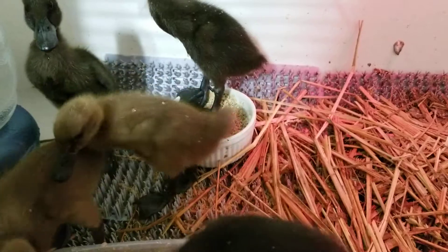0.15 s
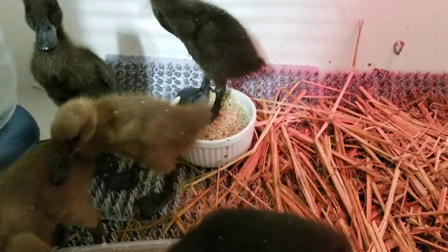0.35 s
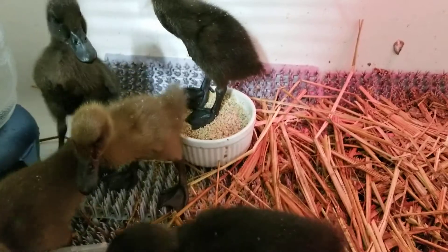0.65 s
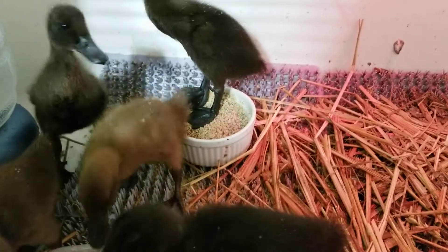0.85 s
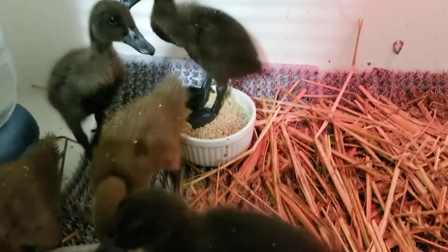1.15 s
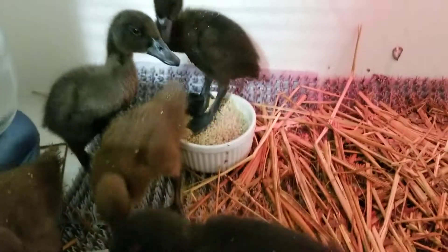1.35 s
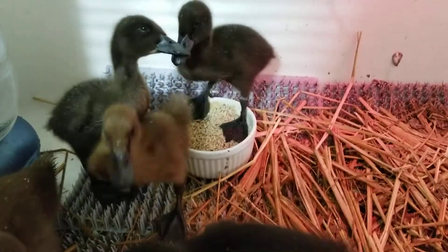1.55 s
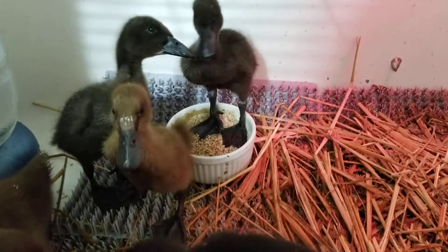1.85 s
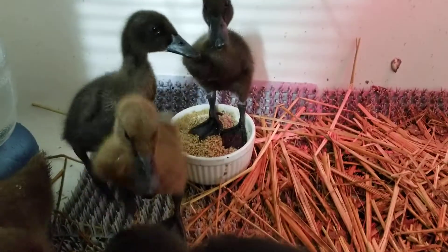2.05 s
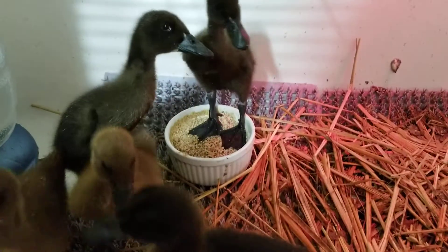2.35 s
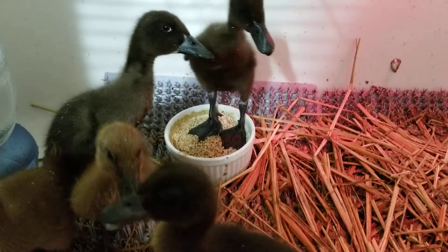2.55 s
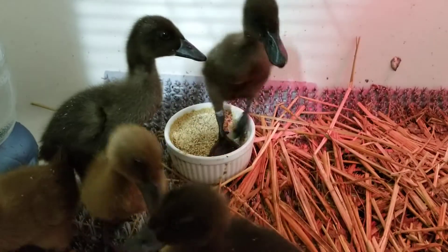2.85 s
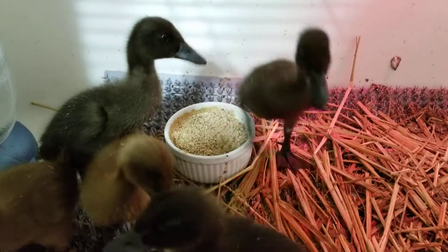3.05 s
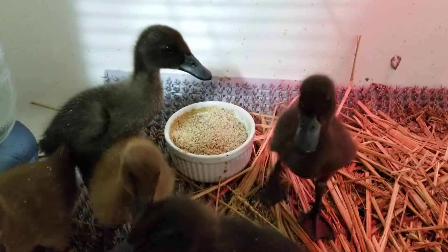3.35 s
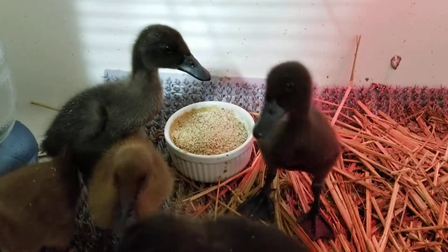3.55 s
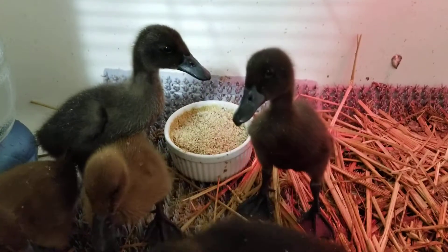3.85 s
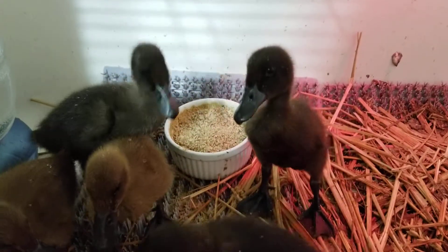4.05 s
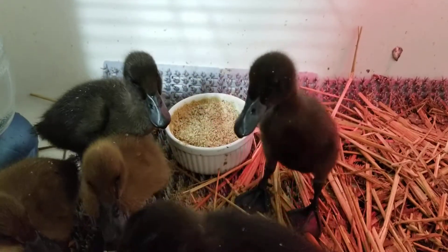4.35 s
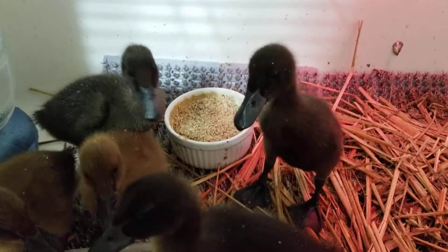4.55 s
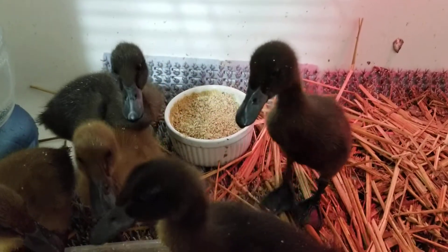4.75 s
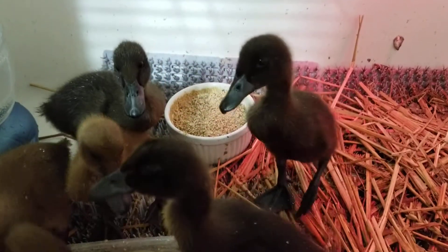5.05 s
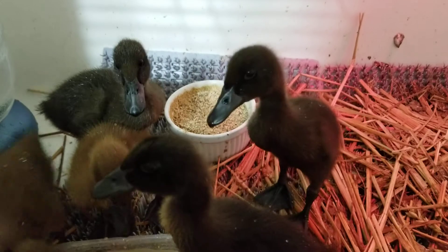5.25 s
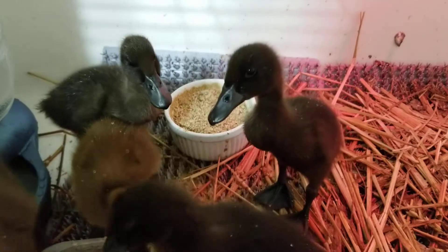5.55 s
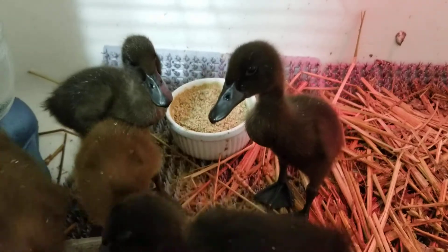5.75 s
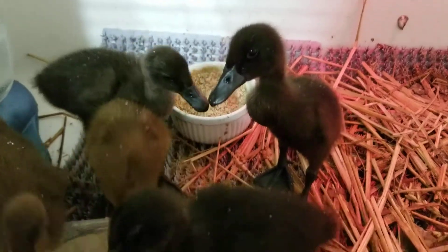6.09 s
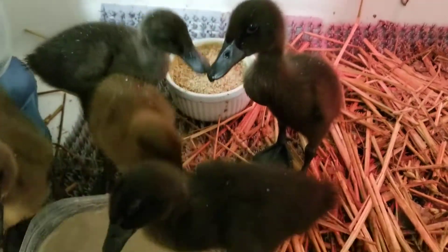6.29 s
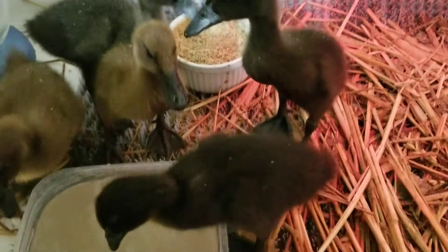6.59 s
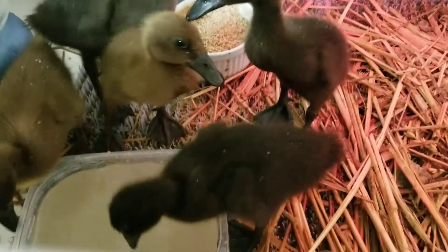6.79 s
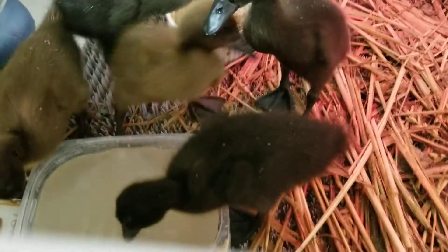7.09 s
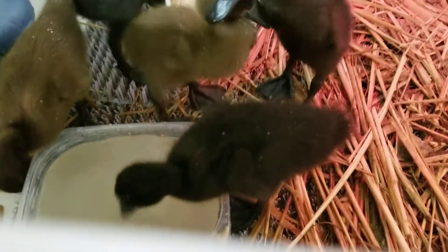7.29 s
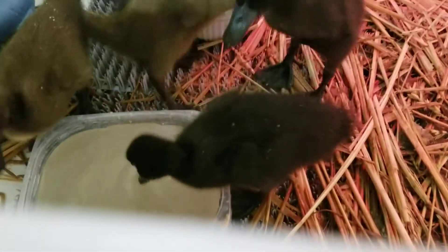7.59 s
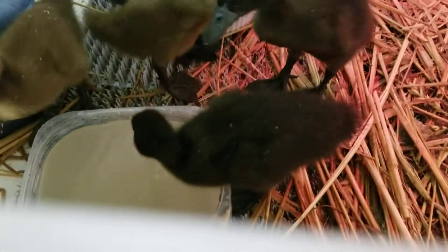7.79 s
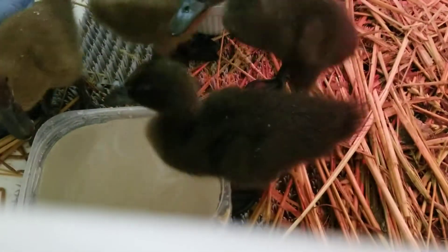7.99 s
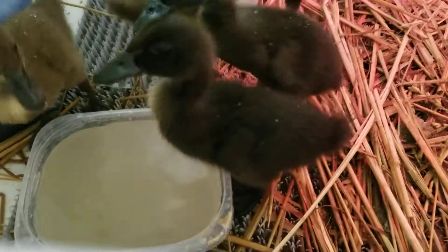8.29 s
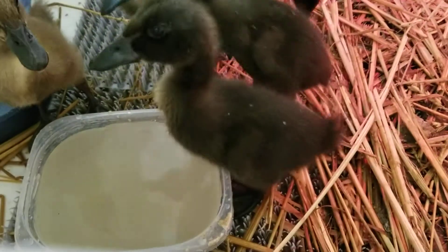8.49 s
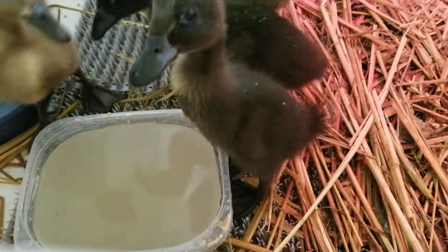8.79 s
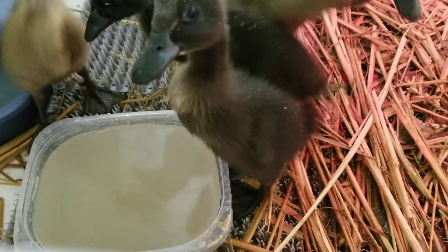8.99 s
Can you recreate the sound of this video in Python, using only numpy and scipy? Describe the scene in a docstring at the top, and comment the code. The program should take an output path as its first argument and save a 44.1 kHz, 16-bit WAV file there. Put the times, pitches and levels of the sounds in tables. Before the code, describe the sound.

Close handheld stereo pickup of ducklings in a plastic tub indoors: quick high chirps, densest around two to four seconds, with dry straw crackles and faint webbed steps. Finger rubs and sharp knocks occur in the first two seconds, then stronger left-sided thuds after five, followed by a fine skin rustle. Chirps thin briefly, then return thickly with straw snaps and growing rumble.

```python
"""Ducklings in a plastic brooder tub in a small room, near a hand-held stereo microphone; faint rumble and hiss behind.
From the start they peep over one another, each a short whistle arching up and down, and crackle the straw underfoot.
Early on a finger bumps and rubs the microphone; things in the tub ring briefly and feet pat between the bumps.
Past the middle harder bumps swing the left port, then the finger covers it and creeps across with a rustle.
Peeps, pats and snaps of straw carry on afterwards, and the low rumble swells towards the end."""
import sys
import numpy as np
from scipy import signal
from scipy.fft import rfft, irfft
from scipy.io import wavfile
from scipy.ndimage import uniform_filter1d, map_coordinates

SR = 44100
rng = np.random.default_rng(int(sys.argv[2]) if len(sys.argv) > 2 else 0)


def store_pcm(level_fs):
    """Save levels as 16-bit WAV."""
    pcm = np.round(np.clip(level_fs, -1, 1) * 32767).astype(np.int16)
    wavfile.write(sys.argv[1], SR, np.atleast_2d(pcm).T)


N = 402633
TIME = np.arange(N) / SR

# Levels in the tables are relative: each layer may trim them, and the tub adds its echoes.
# room background spectrum: pitch_hz [Hz], level_db [dB]
AIR_COLOUR = [(20, -43.5), (45, 4), (85, 3.5), (200, -18.5), (350, -11), (600, -23), (1100, -35),
              (4000, -52), (8000, -59)]
# swell of the low rumble: start_s [s], level_db [dB]
RUMBLE = [(0, -53.5), (.8, -40), (1.9, -52), (3.5, -51.5), (5.4, -44.5), (5.8, -54), (7.9, -57.5),
          (8.8, -40.5), (9.13, -36.5)]

# finger lying on the left port: start_s [s], end_s [s]
COVERED = (5.54, 6.723)
# finger sliding over that port: start_s [s], end_s [s]
CREEP = (5.82, 6.6)
# rustle of skin across the port: pitch_hz [Hz], level_db [dB]
SKIN_COLOUR = [(200, -48), (360, -19.5), (900, -24.5), (2200, -33), (3800, -50), (15000, -44)]
# finger bumps on the microphone: start_s [s], thump_db [dB], snap_db [dB], left_minus_right_db [dB]
KNOCKS = [(0.5474, -15.5, -19.5, 20), (1.204, -22.5, -11, 8), (1.2343, -21, -4.5, 20),
          (1.2393, -16.5, -12, 23), (1.254, -29, -12.5, 16), (1.307, -46, -15.5, 6),
          (1.5821, -24.5, -4, -7), (4.7435, -34.5, -15.5, 34.5), (5.168, -2.5, -8, 63),
          (5.253, -9.5, -24, 36), (5.424, -16.5, -25, 49), (5.487, -14.5, -26, 47), (5.542, -8, -21, 45),
          (6.318, -47, -27.5, 36), (6.51, -72, -35.5, 28), (8.151, -35, -59, 5), (8.205, -50, -36.5, 32)]
# finger slides on the casing: start_s [s], length_s [s], level_db [dB], left_minus_right_db [dB]
RUBS = [(0.382, 0.24, -42.5, 3), (0.676, 0.12, -48.5, 2.5), (0.847, 0.092, -44, 4),
        (1.231, 0.12, -32.5, 10), (5.536, 0.14, -29, 39), (5.657, 0.17, -62, 25)]
# scuff of skin on the casing: pitch_hz [Hz], level_db [dB]
RUB_COLOUR = [(30, -15.5), (120, 0.5), (200, -10), (380, -6), (700, -20), (1500, -28), (5000, -55)]
CASE_LAG_S = 0.0009  # a bump runs through the casing and reaches the left port this much later

# small things nudged in the tub: start_s [s], pitch_hz [Hz], peak_db before the decay [dB], decay_s [s]
RINGS = [(1.975, 1803, -50.5, 0.016), (6.316, 387, -39, 0.0069), (6.585, 485, -37.5, 0.0055)]
# webbed feet patting on the feed dish and the floor: start_s [s], length_s [s], level_db [dB]
PATS = [(2.087, 0.12, -63.5), (2.313, 0.095, -60), (7.494, 0.044, -57.5), (8.193, 0.065, -55.5)]
# dull slap of a soft sole: pitch_hz [Hz], level_db [dB]
PAT_COLOUR = [(150, 13), (350, 10.5), (750, 5), (1300, -11.5), (2500, -14.5)]

# fidgeting of the brood between steps: start_s [s], level_db [dB]
FIDGET = [(0, -61), (2.3, -66.5), (3.0, -63), (4.15, -65), (4.6, -71.5), (6.5, -65), (7.7, -63.5),
          (8.4, -57.5), (9.13, -52)]
# flurries of steps in the straw: start_s [s], length_s [s], level_db [dB]
STEPS = [(0.03, 0.17, -72), (0.419, 0.064, -57.5), (0.68, 0.23, -61), (1.085, 0.4, -58.5),
         (2.05, 0.0073, -54), (2.984, 0.28, -54), (7.383, 0.14, -59.5), (8.153, 0.041, -51.5)]
STEP_ATTACK_S, STEP_SETTLE_S = 0.014, 0.033  # stalks give way quickly and settle more slowly
# sharp snaps of straw and pecks: start_s [s], level_db at the onset [dB]
SNAPS = [(0.069, -52), (0.185, -56), (0.2452, -56.5), (0.281, -53), (0.46, -53.5), (2.039, -56),
         (7.4222, -53.5), (8.035, -57), (8.6573, -54), (8.8388, -47), (8.9478, -55), (9.076, -47.5)]
# brightness of straw: pitch_hz [Hz], level_db [dB]
STRAW_COLOUR = [(500, 1.5), (4000, 2.5), (6500, 4), (12500, 9), (15500, 1)]

# one row a peep: start_s [s], length_s [s], top_hz [Hz], level_db [dB]
PEEPS = [(0.082, 0.054, 2500, -37), (0.125, 0.062, 4370, -46), (0.207, 0.072, 2546, -44),
         (0.228, 0.073, 3110, -47), (0.398, 0.056, 3180, -42), (0.418, 0.087, 3726, -46.5),
         (0.572, 0.055, 3063, -42.5), (0.722, 0.065, 2550, -33.5), (0.948, 0.043, 2340, -51),
         (0.966, 0.071, 3510, -48), (1.092, 0.048, 2800, -40.5), (1.151, 0.08, 4240, -48.5),
         (1.283, 0.06, 2984, -39.5), (1.453, 0.057, 3020, -47), (1.466, 0.061, 3204, -38),
         (1.602, 0.06, 2540, -43.5), (1.63, 0.065, 3380, -45), (1.758, 0.062, 2894, -40.5),
         (1.812, 0.062, 3900, -43.5), (2.025, 0.06, 3790, -47.5), (2.295, 0.058, 2784, -45.0),
         (2.437, 0.07, 3265, -48.5), (2.449, 0.084, 2880, -44.5), (2.464, 0.095, 2616, -40.5),
         (2.589, 0.081, 2780, -43), (2.59, 0.059, 3320, -55), (2.627, 0.053, 3930, -44.5),
         (2.632, 0.084, 2926, -32.5), (2.667, 0.044, 2795, -38.5), (2.735, 0.054, 2925, -40.5),
         (2.743, 0.072, 3330, -49.0), (2.857, 0.046, 3005, -33.5), (2.909, 0.074, 2980, -44.5),
         (3.074, 0.05, 2934, -38), (3.105, 0.087, 3380, -45), (3.297, 0.061, 4200, -44.0),
         (3.333, 0.065, 2514, -47.5), (3.43, 0.056, 2630, -41.5), (3.482, 0.067, 2990, -43),
         (3.499, 0.051, 4150, -42), (3.578, 0.084, 3270, -45), (3.617, 0.061, 3080, -36),
         (3.622, 0.059, 3104, -34.5), (3.706, 0.073, 3550, -46.5), (3.761, 0.063, 3165, -35.5),
         (3.776, 0.094, 4140, -49.5), (3.871, 0.067, 3104, -33.0), (3.955, 0.073, 3490, -52.5),
         (4.059, 0.06, 2720, -42.5), (4.143, 0.066, 2634, -43), (4.255, 0.058, 3050, -38.5),
         (4.286, 0.074, 3246, -42.5), (4.418, 0.059, 3320, -42.5), (4.569, 0.064, 3240, -42.5),
         (4.774, 0.064, 2680, -43.5), (4.964, 0.066, 2476, -49.5), (5.106, 0.077, 3240, -51.5),
         (5.2, 0.071, 2785, -43.5), (5.33, 0.081, 2956, -39.0), (5.583, 0.069, 3210, -42.5),
         (5.754, 0.058, 3190, -41.5), (6.072, 0.068, 2964, -45.5), (6.226, 0.09, 3217, -46),
         (6.532, 0.044, 3680, -47), (6.566, 0.078, 2780, -50), (6.734, 0.051, 3640, -47.5),
         (6.764, 0.058, 2730, -46.5), (6.932, 0.052, 2896, -51), (6.982, 0.056, 3550, -51.5),
         (7.054, 0.052, 2615, -41.5), (7.172, 0.062, 3200, -41), (7.288, 0.053, 2974, -38),
         (7.632, 0.057, 2920, -46), (7.688, 0.071, 2507, -42.0), (7.782, 0.048, 2540, -49),
         (7.803, 0.07, 3206, -43), (7.938, 0.064, 2546, -36), (7.945, 0.034, 3510, -43),
         (7.954, 0.045, 3060, -42.0), (8.149, 0.067, 2860, -37.5), (8.353, 0.082, 2960, -40.5),
         (8.413, 0.06, 2300, -49.5), (8.507, 0.064, 2650, -40.5), (8.525, 0.068, 2874, -36),
         (8.574, 0.054, 2780, -47), (8.689, 0.046, 4020, -39.5), (8.707, 0.049, 3163, -36),
         (8.809, 0.081, 2914, -39), (8.87, 0.045, 4060, -42.5), (8.96, 0.08, 3086, -36)]
# second harmonic, an octave above the whistle and fainter: start_s [s], level_db [dB]
OVERTONE = [(0, -22.5), (4.2, -26.5), (4.42, -13), (4.8, -35), (5.3, -17), (7.9, -22.5), (8.5, -13),
            (9.1, -11)]
# the small throat lets out little of the lowest and highest pitches: pitch_hz [Hz], level_db [dB]
THROAT = [(1400, -13), (2250, -1.5), (4000, -5)]
# the brood keeps to the left: start_s [s], left_minus_right_db [dB]
BROOD_SIDE = [(2.2, 5), (2.75, 6), (3.3, 2.5), (9, 3)]
RISE_SHARE = 0.46  # part of a peep spent rising
USUAL_TOP_HZ, STRAIN = 2862, 4  # roughness grows as this power of the top pitch: high peeps are hoarse
# the other side of the syrinx joins in: pitch ratio, level in dB, share of pitch jitter
TWIN_RATIO, TWIN_DB, TWIN_JITTER = 1.29, -32.5, 0.034
NEAR_DB, NEARNESS = -42, 0.08  # louder peeps echo very slightly less: dB of echo lost per dB above NEAR_DB

# the tub rings loudest near the top of a peep: pitch_hz [Hz], level_db [dB]
TAIL_COLOUR = [(1800, -3), (3000, 1), (4200, -0.5)]
ROOM_T60 = 0.34  # s
PORT_LAG_S = 0.0001  # sound from the tub is held back this much at the right port, plus a small chance shift
# a notch of the microphone port: pitch_hz [Hz], level_db [dB]
MIC_COLOUR = [(6700, 1.5), (7900, -10.5), (10000, -3.5)]
EDGE_HZ = 15900  # upper band limit


def gain_of(db):
    """Decibels to amplitude."""
    return 10 ** (np.asarray(db) / 20)


def evened(x):
    """Scales to rms 1."""
    return x / np.sqrt(np.mean(x ** 2) + 1e-20)


def follow(points, s):
    """Reads a course of levels at time s."""
    return np.interp(s, *np.transpose(points))


def read(points, hz):
    """Reads a spectrum on a log-frequency axis."""
    f, value = np.transpose(points)
    return np.interp(np.log(hz + 1), np.log(f), value)


def coloured(x, points):
    """Filters by a spectrum in dB."""
    size = x.shape[-1]
    gains = gain_of(read(points, np.fft.rfftfreq(size, 1 / SR)))
    return irfft(rfft(x) * gains, size)


def lowpass(x, hz, order=2):
    """Causal low-pass."""
    return signal.sosfilt(signal.butter(order, hz, fs=SR, output="sos"), x)


def wander(size, hz):
    """Smooth chance of rms about 1 that takes a new value hz times a second."""
    at = np.arange(size) * hz / SR
    values = rng.standard_normal(size // 16 + 4)
    return map_coordinates(values, [at], order=1, mode="wrap") * np.sqrt(3 / 2)


def panned(x, side_db):
    """Left and right that differ by side_db, with gains of mean power 1."""
    gains = gain_of([[side_db / 2], [-side_db / 2]])
    return evened(gains) * x


def add(mix, s, sound):
    """Mixes a sound in at time s."""
    part = mix[..., max(round(s * SR), 0):][..., :sound.shape[-1]]
    part += sound[..., :part.shape[-1]]


def brooder(x, walls_db, room_db, walls_s=0.012):
    """Direct sound, quick echoes off the tub walls and the tail of the room, for one spot in the tub."""
    t = np.arange(SR // 2) / SR
    tail = coloured(rng.standard_normal((2, len(t))), TAIL_COLOUR) * gain_of(-60 * t / ROOM_T60)
    tail *= np.minimum(t / walls_s, 1)
    response = gain_of(room_db) * tail / np.linalg.norm(tail[0])
    for ear, lag_s in zip(response, (0, PORT_LAG_S)):
        delays = rng.uniform(0.15, 1, size=8) * walls_s
        echoes = rng.choice([-1, 1], len(delays)) / np.sqrt(len(delays))
        ear[(delays * SR).astype(int)] += gain_of(walls_db) * echoes
        ear[int(lag_s * SR) + rng.integers(5)] += 1  # direct sound
    return signal.oaconvolve(x * np.ones((2, 1)), response, axes=1)[:, :N]


def air(hiss_db=-73, upper_db=-55):
    """Low rumble that swells, the steady air of the room, and a thin high hiss."""
    noise = evened(coloured(rng.standard_normal((2, N)), AIR_COLOUR))
    low = coloured(noise, [(130, -4.5), (260, -16.5)])
    rumble = low * gain_of(follow(RUMBLE, TIME) + 1.0 * wander(N, 4.4))
    hiss_colour = [(8000, -27.5), (11500, -1.5), (16000, -4.0)]
    hiss = evened(coloured(rng.standard_normal((2, N)), hiss_colour))
    room = rumble + gain_of(upper_db) * (noise - low)
    shared = (room + 0.42 * room[::-1]) / np.sqrt(2)  # each port hears some of the other side
    return panned(shared, 4.4) + gain_of(hiss_db) * hiss


def finger_on_port(background, skin_db=-49.5, sealed_db=-22):
    """The finger seals the left port against the background, rests, then creeps across with a fine, even rustle."""
    start, end = COVERED
    sealed = uniform_filter1d(((TIME > start) & (TIME < end)) * 1., SR // 50)
    slips = rng.standard_normal(N) * gain_of(2.2 * wander(N, 400) + 1.2 * wander(N, 45))
    progress = np.clip((TIME - CREEP[0]) / (CREEP[1] - CREEP[0]), 0, 1)
    stroke = np.sqrt(np.maximum(np.sin(np.pi * progress), 0))
    rustle = gain_of(skin_db) * evened(coloured(slips, SKIN_COLOUR)) * stroke
    left = background[0] * gain_of(sealed_db * sealed) + rustle
    return np.array([left, background[1]])


def rubs(grit_db=3.5, lump_db=2.8):
    """Skin sticks and slips on the casing: a low, lumpy scuffing that fades as the finger slows."""
    out = np.zeros((2, N))
    for s, length, db, side_db in RUBS:
        lumps_db = grit_db * wander(SR // 2, 305.4) + lump_db * wander(SR // 2, 92.3)
        slips = rng.standard_normal((2, SR // 2)) * gain_of(lumps_db)
        u = np.linspace(0, 1, int(length * SR))
        stroke = abs(np.sin(np.pi * np.sqrt(u))) ** 0.73
        scuff = evened(coloured(slips, RUB_COLOUR)[:, :len(u)] * stroke)
        add(out, s, panned(gain_of(db) * scuff, side_db))
    return out


def knocks(thump_hz=61, thump_s=0.014, press_s=0.00027, stiffening=0.62, case_hz=720, case_s=0.00021,
           case_db=4, tick_db=-27, scuff_db=-11, scuff_s=0.0076):
    """A bump snaps the casing with a tick, scuffs skin and squeezes the port air: a low swing, quicker if harder."""
    out, t = np.zeros((2, N)), np.arange(SR // 8) / SR
    for s, thump_db, snap_db, side_db in KNOCKS:
        quick = t * (1 + stiffening * gain_of(thump_db))
        bent = quick + 0.0067 * (1 - np.exp(-quick / 0.0014))  # the pitch starts high and sinks
        swing = np.sin(2 * np.pi * thump_hz * bent) * np.exp(-quick / thump_s)
        scuff = evened(coloured(rng.standard_normal(len(t)), RUB_COLOUR)) * np.exp(-t / scuff_s)
        snap = gain_of(snap_db + case_db) * np.cos(2 * np.pi * case_hz * t) * np.exp(-t / case_s)
        press = 1 - np.exp(-t / press_s)
        thump = gain_of(thump_db - 2) * (swing + gain_of(scuff_db) * scuff) * press
        bump = lowpass(thump + snap, 1850, order=6) + gain_of(tick_db) * snap
        left, right = panned(bump, side_db)
        add(out[0], s, left)
        add(out[1], s - CASE_LAG_S, right)
    return out


def rings():
    """One dying mode for each nudged thing in the tub."""
    out, t = np.zeros(N), np.arange(SR // 4) / SR
    for s, hz, db, decay_s in RINGS:
        add(out, s, gain_of(db) * np.sin(2 * np.pi * hz * t) * np.exp(-t / decay_s))
    return brooder(out, walls_db=0, room_db=1.0)


def pats(grit_db=3.0):
    """Soft soles slap and shuffle: dull, grainy puffs."""
    out = np.zeros(N)
    for s, length, db in PATS:
        u = np.linspace(0, 1, int(length * SR))
        grains = rng.standard_normal(SR // 2) * gain_of(grit_db * wander(SR // 2, 138.0))
        puff = coloured(grains, PAT_COLOUR)[:len(u)] * np.sin(np.pi * np.sqrt(u))
        add(out, s, gain_of(db) * evened(puff))
    return brooder(out, walls_db=-1.5, room_db=-22)


def treading():
    """How hard the straw is stirred: slowly varying fidgeting, and flurries of steps that rise, hold and settle."""
    power = gain_of(follow(FIDGET, TIME)) ** 2
    for s, length, db in STEPS:
        t = np.arange(int((length + 1 / 2) * SR)) / SR
        attack = np.minimum(t / STEP_ATTACK_S, 1)
        settle = np.exp(-np.maximum(t - length, 0) / STEP_SETTLE_S)
        add(power, s, (gain_of(db) * attack * settle) ** 2)
    return np.sqrt(power)


def straw(level_db=-5.0, snap_db=5, per_s=1100, spread_db=7, snap_s=0.0031):
    """Stalks crackle in chance clicks under webbed feet; now and then one snaps or a bill strikes."""
    sizes = gain_of(spread_db * np.minimum(rng.exponential(1, N), 4))
    cracks = sizes * (rng.random(N) < per_s / SR) * rng.standard_normal((2, N))
    crackle = evened(coloured(cracks, STRAW_COLOUR)) * gain_of(level_db) * treading()
    snaps, t = np.zeros((2, N)), np.arange(SR // 50) / SR
    for s, db in SNAPS:
        burst = rng.standard_normal((2, len(t))) * np.exp(-t / snap_s)
        add(snaps, s, gain_of(db + snap_db) * burst)
    return brooder(crackle + coloured(snaps, STRAW_COLOUR), walls_db=1.0, room_db=2)


def peep(length, top_hz, overtone_db, depth=0.43, arch=2.45, jitter=0.013, flutter_db=3.2, rasp_db=-21,
         third_db=-36):
    """A whistle arching with the drive of the syrinx: clean flanks, overtones and roughness at the top."""
    t = np.arange(int(length * SR)) / SR
    rise = length * RISE_SHARE
    from_top = np.where(t < rise, 1 - t / rise, (t - rise) / (length - rise))
    drive = 1 - from_top ** arch
    hz = top_hz * (1 - depth * (1 - drive))
    rough = (top_hz / USUAL_TOP_HZ) ** STRAIN * drive ** 2
    waver, twin_waver = (wander(SR // 4, 693)[:len(t)] for _ in range(2))
    flutter = wander(SR // 4, 209.6)[:len(t)]
    rasp = 1 + gain_of(rasp_db) * rough * wander(SR // 4, 1700)[:len(t)]
    phase = 2 * np.pi * np.cumsum(hz * (1 + jitter * rough * waver)) / SR
    twin_hz = TWIN_RATIO * hz * (1 + TWIN_JITTER * twin_waver)
    twin = np.sin(2 * np.pi * np.cumsum(twin_hz) / SR)
    harmonics = gain_of(overtone_db) * np.sin(2 * phase) + gain_of(third_db) * np.sin(3 * phase)
    tone = np.sin(phase) + drive ** 2 * (harmonics + gain_of(TWIN_DB) * twin)
    loudness = gain_of(flutter_db * flutter + read(THROAT, hz))
    return tone * rasp * loudness * signal.windows.tukey(len(t), 0.09)


def ducklings(level_db=-2.5, walls_db=-7.0, room_db=-4.0):
    """Each peep has its own spot in the tub; louder ones echo very slightly less."""
    out = np.zeros((2, N))
    for s, length, top_hz, db in PEEPS:
        call = gain_of(db + level_db) * peep(length, top_hz, follow(OVERTONE, s))
        echo_db = NEARNESS * (NEAR_DB - db)
        placed = panned(call, follow(BROOD_SIDE, s))
        add(out, s, brooder(placed, walls_db + echo_db, room_db + echo_db))
    return out


def scene():
    """Room and the hand on the microphone, then bedding and birds."""
    hand = finger_on_port(air()) + rubs() + knocks()
    return hand + rings() + pats() + straw() + ducklings()


def record(dry):
    """Microphone colour, full-scale limit, then the band limit."""
    limited = np.clip(coloured(dry, MIC_COLOUR), -1, 1)
    band = signal.firwin(511, EDGE_HZ, window=("kaiser", 9), fs=SR)
    return signal.oaconvolve(limited, band[None], "same")


dry = scene()
out = record(dry)
store_pcm(out)
```